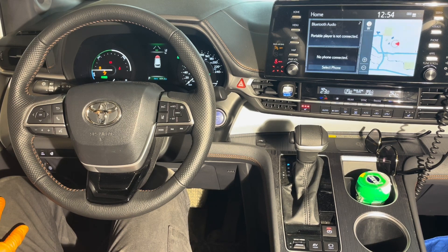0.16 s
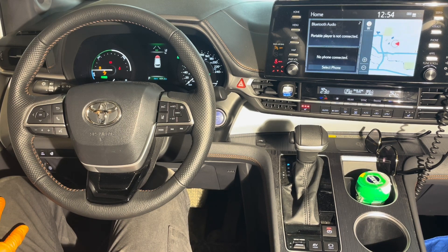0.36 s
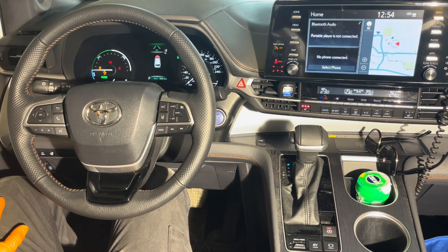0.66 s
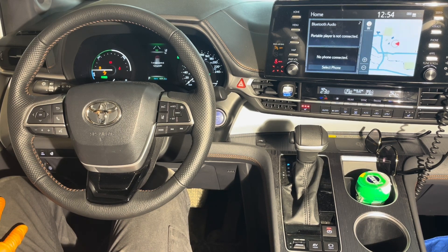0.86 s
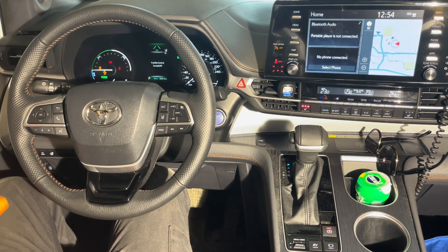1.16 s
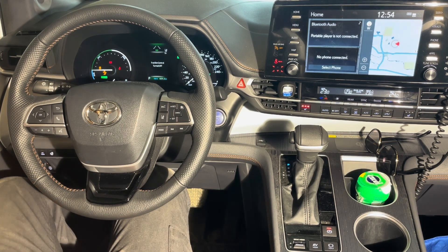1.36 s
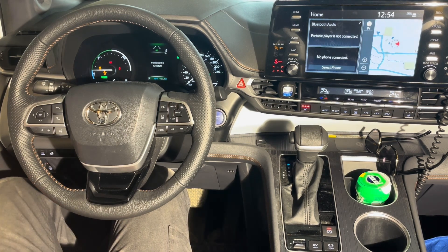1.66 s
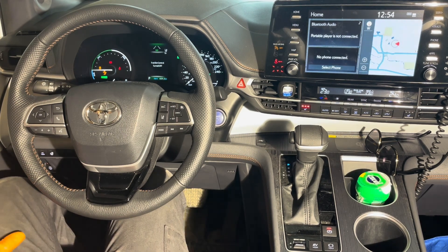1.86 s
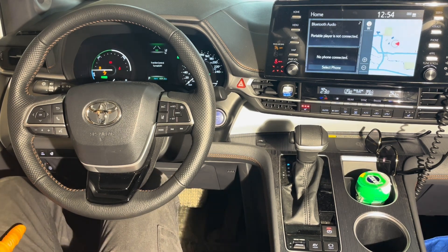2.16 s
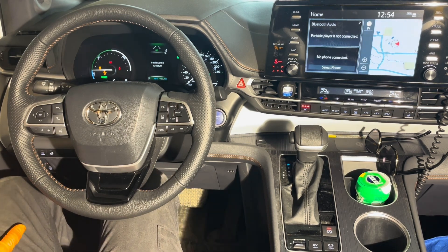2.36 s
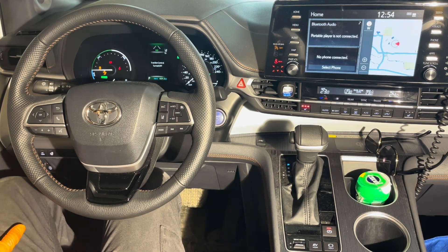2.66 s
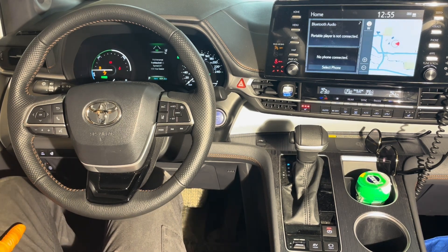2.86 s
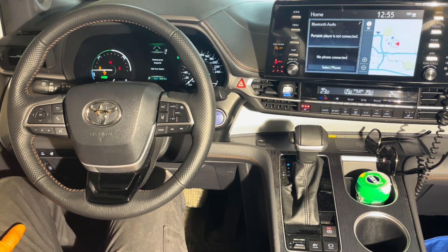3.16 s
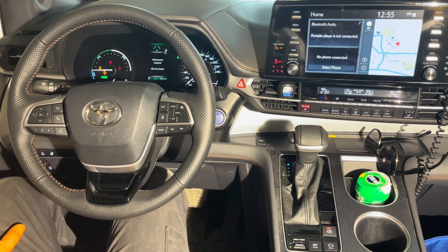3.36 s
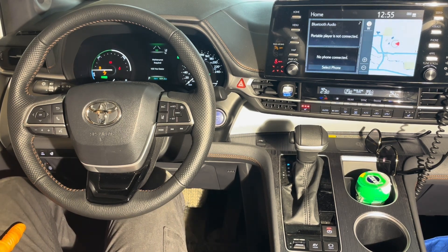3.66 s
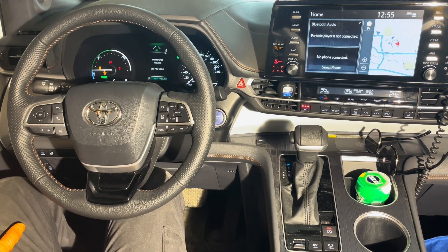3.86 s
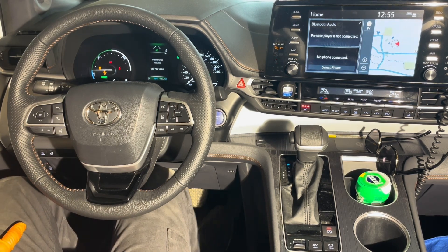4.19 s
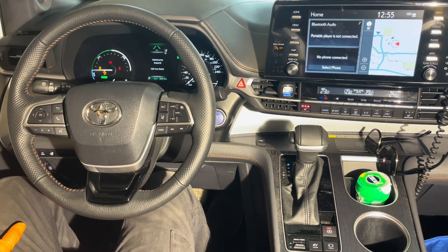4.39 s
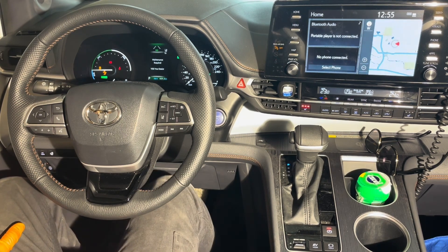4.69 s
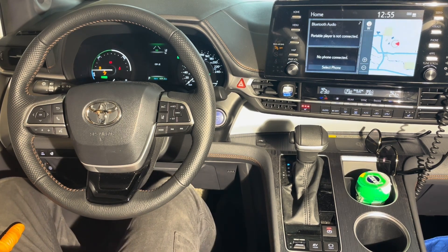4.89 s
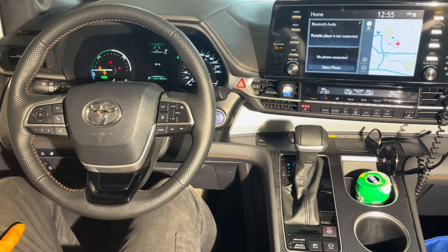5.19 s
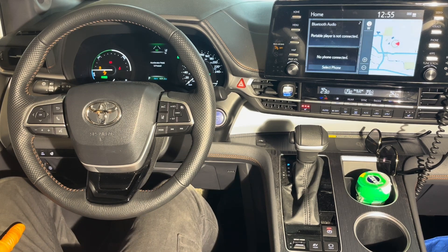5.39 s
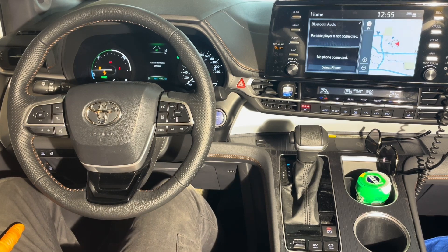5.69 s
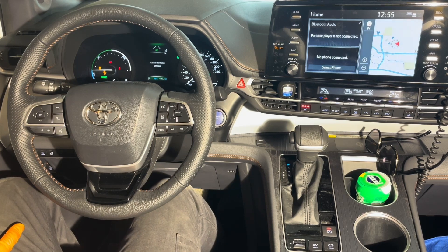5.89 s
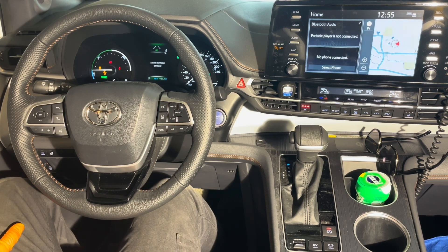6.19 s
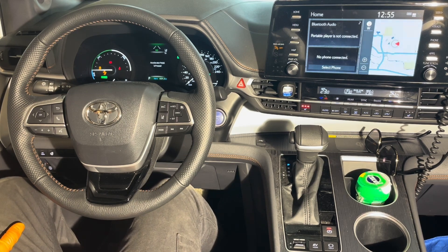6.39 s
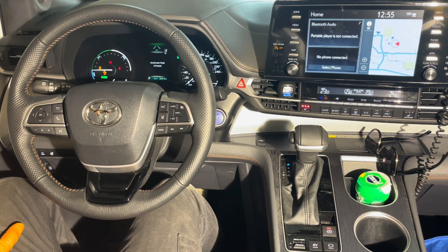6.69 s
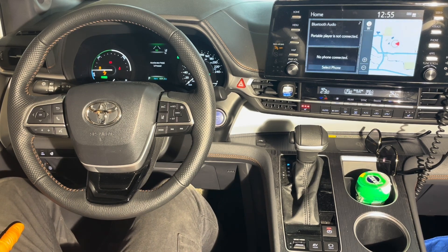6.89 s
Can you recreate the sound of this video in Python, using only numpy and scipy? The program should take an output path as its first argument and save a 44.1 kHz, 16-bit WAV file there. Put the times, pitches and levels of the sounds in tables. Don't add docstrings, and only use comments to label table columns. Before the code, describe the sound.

Car cabin interior: steady brisk engine idle, wavering fan drone and soft booming, then the throttle opens and the engine climbs in pitch.

```python
import sys
import numpy as np
from scipy import signal
from scipy.fft import rfft, irfft, next_fast_len
from scipy.io import wavfile
from scipy.ndimage import map_coordinates

SR = 44100
rng = np.random.default_rng(int(sys.argv[2]) if len(sys.argv) > 2 else 0)


def nominal_scale(level):
    x = np.asarray(level, float) / 20
    return 10 ** x


def inscribe(sig):
    pcm = np.round(np.clip(np.atleast_2d(sig).T, -1, 1) * 32767)
    wavfile.write(sys.argv[1], SR, pcm.astype(np.int16))


N = 310464
TIME = np.arange(N) / SR

# (centre [Hz], width [Hz], level over the flat path [dB])
PANELS = [(323, 24, 7), (352, 27, 9), (418, 20, 0.5), (530, 22, 12.5), (589, 37, 12.5), (683, 50, -21),
          (815, 56, 7.5), (906, 25, 3), (968, 26, 2.5), (1008, 31, 4.5), (1134, 25, 9.5), (1270, 37, 2),
          (1400, 14, 5.5), (1500, 18, 7.5), (1595, 48, 7), (1761, 39, 8.5), (1873, 30, 6), (1978, 23, 4),
          (2160, 31, 3.5), (2306, 20, 10), (2425, 26, 4.5), (2624, 44, 7), (2820, 45, 7), (3565, 39, 7.5),
          (10380, 150, -17)]


def curves(rows):
    knots_s, *columns = np.transpose(rows)
    return [np.interp(TIME, knots_s, column) for column in columns]


def wobble(rate_hz):
    knots = rng.standard_normal(int(N * rate_hz / SR) + 4)
    return np.interp(TIME * rate_hz, np.arange(len(knots)), knots)


def filtered(x, response):
    size = next_fast_len(N + 8192)
    return irfft(rfft(x, size) * response(np.fft.rfftfreq(size, 1 / SR)), size)[..., :N]


def rush(spectrum, shape=lambda hz: 1, source=None):
    knots_hz, db = np.transpose(spectrum)
    if source is None:
        source = rng.standard_normal((2, N))

    def colour(hz):
        return nominal_scale(np.interp(np.log(hz + 1), np.log(knots_hz), db)) * shape(hz)
    pair = filtered(source, colour)
    return pair / pair.std()


def tone(turns, db):
    return np.sqrt(2) * nominal_scale(db) * np.sin(2 * np.pi * (turns + rng.random()))


def lift(hz, modes):
    power = sum(nominal_scale(db) ** 2 / (1 + (2 * (hz - centre) / width) ** 2) for centre, width, db in modes)
    return np.sqrt(1 + power)


def vents():
    # (time [s], level [dB])
    flow = [
        (0, -68.5),
        (5.39, -67.5),
        (5.43, -74),
        (6.21, -67.5),
        (6.41, -65),
        (7.04, -65.5),
    ]
    # (frequency [Hz], density [dB per Hz])
    hiss = [(1500, -9), (3000, 8), (5000, -2.5), (7000, -5.5), (9000, -1.5), (10400, -10), (11800, -5.5),
            (13500, -29), (14500, -7), (15500, -9)]
    return nominal_scale(curves(flow)[0] + 11.5 + .6 * wobble(7.7)) * rush(hiss)


def trim_knock():
    # (time [s], level [dB], frequency [Hz])
    taps = [
        (4.04, -42, 312),
        (4.05, -44, 355),
        (4.075, -44, 290),
    ]
    knock = np.zeros(N)
    for start_s, db, hz in taps:
        since_s = np.clip(TIME - start_s, 0, None)
        knock += nominal_scale(db - 60 * since_s / 0.25) * np.sin(2 * np.pi * hz * since_s)
    return knock


def cabin_boom():
    # (middle time [s], length [s], level [dB])
    swells = [(0.203, 0.32, -42.5), (0.667, 0.58, -42.5), (1.32, 0.53, -42), (1.95, 0.36, -41),
              (2.396, 0.56, -40), (3.05, .4, -49), (3.4, 0.42, -41.5), (3.9, 0.61, -43.5),
              (4.52, 0.25, -41), (4.95, .5, -40), (5.331, 0.31, -39.5), (6.747, 0.59, -42.5)]
    envelope = np.zeros(N)
    for middle_s, length_s, db in swells:
        place = np.clip((TIME - middle_s) / (1.2 * length_s), -.5, .5)
        envelope += nominal_scale(db) * np.cos(np.pi * place)
    return envelope * tone(129.4 * TIME, 0)


def fan():
    # (time [s], shaft rate [Hz])
    speed = [(0, 24), (.5, 21.1), (1.02, 18.7), (1.4, 21.6), (2, 24.6), (2.4, 25.8), (2.8, 25.6),
             (3.2, 26.55), (4, 25.5), (4.9, 25.8), (7.04, 26.4)]
    # (multiple of the shaft, level [dB])
    blades = [(7, -44), (9, -53), (12, -60), (14, -60.5), (16, -65)]
    # (frequency [Hz], gain [dB])
    duct = [(150, -21), (163, -17), (174, -3), (184, 0.5), (196, -2), (210, 5), (230, 2.5), (240, -8.5)]
    shaft_hz, = curves(speed)
    turns = np.cumsum(shaft_hz) / SR
    sound = tone(turns, -68)
    for multiple, db in blades:
        duct_db = np.interp(multiple * shaft_hz, *np.transpose(duct))
        sound += tone(multiple * turns, db + duct_db + 1.8 * wobble(6))
    return sound


def throttle_air():
    # (time [s], level [dB])
    whistle = [
        (0, -95),
        (6.1, -94),
        (6.3, -72),
        (6.6, -67),
        (6.7, -76),
        (7.04, -68),
    ]
    # (frequency [Hz], density [dB per Hz])
    wheeze = [(9500, -30), (10800, 8), (11700, 6), (12500, -13), (13500, -30)]
    return nominal_scale(curves(whistle)[0]) * rush(wheeze)


def generator_whine(cycle):
    # (time [s], level [dB])
    level = [
        (0, -95),
        (5.75, -82),
        (5.95, -72),
        (6.12, -63),
        (6.25, -66),
        (6.4, -63),
        (6.48, -85),
        (7.04, -90),
    ]
    return tone(87 * 4 * cycle + .12 * wobble(60), curves(level)[0] + 2.5 * wobble(25))


def timing_chain(firing_hz, uneven_cycle):
    past_db = -20 * np.clip((firing_hz - 44.5) / 4, 0, 1)
    climb_db = 6 * np.minimum(firing_hz - 43.4, .5)
    return tone(76 * uneven_cycle, -50.5 + climb_db + wobble(5) + past_db + wobble(25))


def bulkhead(hz):
    knots_hz = np.arange(0, SR / 2, 25)
    ripple_db = np.interp(hz, knots_hz, 4 * np.sin(knots_hz ** 2))
    return lift(hz, PANELS) * nominal_scale((hz > 2900) * ripple_db)


def clatter(cycle):
    steps = 2048
    patterns = rng.standard_normal((2, 12, steps))
    place = [TIME * 1.5, cycle % 1 * (steps - 1)]
    return np.array([map_coordinates(pattern, place, order=1) for pattern in patterns])


def mechanical_roar(cycle, revved, effort_db):
    # (frequency [Hz], density [dB per Hz])
    roar = [(200, -23), (400, -8.5), (700, -3.5), (1100, -7.5), (1600, -5), (2400, -7), (3200, -15),
            (5000, -18.5), (7000, -27), (9500, -42), (15500, -46)]
    firing_swell = .05 * np.sin(2 * np.pi * 4 * cycle)
    crank_swell = .06 * np.sin(2 * np.pi * 2 * cycle)
    works = (1 + firing_swell + crank_swell) * rng.standard_normal((2, N))
    works += nominal_scale(-1.5 + 4.5 * revved) * clatter(cycle)
    return nominal_scale(effort_db + 4.5 + .35 * wobble(9)) * rush(roar, bulkhead, works)


def rumble(effort_db, tip_in_db):
    # (frequency [Hz], density [dB per Hz])
    spectrum = [(15, -33), (33, -22), (40, -6), (70, -0.5), (110, -3), (150, -3.5), (200, 0), (260, -8.5),
                (450, -10), (900, -16.5), (1500, -39)]
    level_db = -47 + 0.58 * (effort_db + 54.5) + 0.34 * tip_in_db + 0.2 * wobble(2.6)
    return nominal_scale(level_db) * rush(spectrum)


def crank_orders(firing_hz, uneven_cycle, revved, tip_in_db):
    # (multiple of the cycle, level at idle [dB], level revved [dB])
    orders = [(2, -68, -69), (3, -60, -52.5), (5, -64.5, -57), (6, -81, -72), (7, -53.5, -54),
              (9, -91, -66), (10, -62.5, -59), (11, -61.5, -56.5), (12, -61, -64), (13, -72, -54.5),
              (14, -67.5, -62), (16, -56.5, -59.5), (17, -63.5, -70), (18, -60, -62.5), (19, -65, -68),
              (20, -65, -66.5), (24, -70, -70.5),
              (32, -80, -66), (36, -80, -72), (44, -80, -68), (48, -79, -72), (52, -84, -63),
                  (54, -78, -71), (58, -76, -66), (72, -84, -60), (76, -90, -63), (80, -80, -63),
                  (88, -73, -80)]
    # (centre [Hz], width [Hz], level over the flat path [dB])
    air_modes = [(133, 13, 5), (183, 17, 5), (250, 18, 4), (297, 41, 4.5)]
    grid_hz = np.arange(2000)
    path = lift(grid_hz, air_modes + PANELS)
    sound = np.zeros(N)
    for order, idle_db, rev_db in orders:
        gain = np.interp(order * firing_hz / 4, grid_hz, path)
        level_db = idle_db + revved * (rev_db - idle_db) + tip_in_db + 3 * wobble(5)
        sound += gain * tone(order * uneven_cycle, level_db)
    return sound


def firing_tones(firing_hz, cycle, revved):
    # (firing rate [Hz], firing tone level [dB], second harmonic level [dB])
    by_speed = [(43.9, -52, -54), (47.5, -46, -40), (53.5, -57, -39), (56.5, -48, -31.5), (61, -40, -36),
                (64.5, -40, -34), (71.5, -33, -42), (76, -32, -54)]
    speed_hz, first_db, second_db = np.transpose(by_speed)
    unsteady_db = 2 * (1 - .7 * revved)
    first = tone(4 * cycle, np.interp(firing_hz, speed_hz, first_db) + unsteady_db * wobble(5))
    second = tone(8 * cycle, np.interp(firing_hz, speed_hz, second_db) + unsteady_db * wobble(5))
    return first + second


def engine():
    # (time [s], firing rate [Hz], effort level [dB])
    running = [(0, 43.3, -51.5), (.6, 42.91, -52), (.85, 43.66, -52), (1.35, 43.4, -52), (1.6, 43.69, -51),
               (2, 43.09, -52), (2.6, 43.63, -50.5), (3.1, 43.87, -50.8), (3.45, 43.29, -51),
               (3.8, 43.6, -50.5), (4.4, 43.07, -51), (5.4, 43.5, -51), (5.5, 45.32, -49),
               (5.95, 58.12, -47.5), (6.25, 65.6, -46), (6.55, 70.8, -46.5), (6.75, 73.07, -46),
               (7.04, 75.98, -44)]
    firing_hz, effort_db = curves(running)
    cycle = np.cumsum(firing_hz) / SR / 4
    uneven_cycle = cycle + .001 * wobble(30)
    revved = np.clip((firing_hz - 44) / 22, 0, 1)
    tip_in_s, tip_in_lasts_s = 5.6, 0.11
    tip_in_db = 8 * np.exp(-((TIME - tip_in_s) / tip_in_lasts_s) ** 2)
    tones = firing_tones(firing_hz, cycle, revved)
    tones += timing_chain(firing_hz, uneven_cycle)
    tones += crank_orders(firing_hz, uneven_cycle, revved, tip_in_db)
    tones += generator_whine(cycle)
    noise = mechanical_roar(cycle, revved, effort_db) + rumble(effort_db, tip_in_db)
    return tones, noise + throttle_air()


def ports(pair):
    # (frequency [Hz], left lead [rad], likeness [0-1], left minus right [dB])
    spacing = [(70, 0, 0.9, -2), (148, 0.2, 0.65, -1.6), (370, 0.37, 0.4, 4.5), (466, 2, 0.66, 6.5),
               (815, 1.65, 0.67, 6.5), (1240, 2.5, 0.29, 2.5), (2300, 6, 0.64, 1), (3260, 6.5, 0.15, 3),
               (3720, 6.5, 0.37, 3), (6630, 6.5, .5, 1), (7340, 2.5, 0.34, 1.5), (11000, 0.8, 0.9, -1),
               (12600, -14, 0.4, -2), (14400, 6.5, .9, 3)]
    knots_hz, lead_rad, alike, balance_db = np.transpose(spacing)

    def mix(hz):
        turn = np.arccos(np.clip(np.interp(hz, knots_hz, alike), 0, 1)) / 2
        skew = nominal_scale(np.interp(hz, knots_hz, balance_db) / 2)
        skew = skew * np.exp(.5j * np.interp(hz, knots_hz, lead_rad))
        left = [skew * np.cos(turn), skew * np.sin(turn)]
        right = [np.cos(turn) / skew, -np.sin(turn) / skew]
        return np.array([left, right])
    return filtered(pair, mix).sum(axis=1)


def scene():
    engine_tones, engine_noise = engine()
    tones = engine_tones + fan() + cabin_boom() + trim_knock()
    common_only = np.array([[1], [0]])
    return ports(engine_noise + vents() + common_only * tones)


def top_cut(x):
    return signal.sosfilt(signal.butter(12, 15750, fs=SR, output="sos"), x)


def record(dry):
    # (frequency [Hz], gain [dB])
    mid_kept = [(7300, 0), (7620, -6), (7640, -80), (8940, -80), (8960, -4), (9400, 0), (12400, 0),
                (13100, -3), (13740, -7), (13760, -80)]
    # (frequency [Hz], gain [dB])
    side_kept = [(10300, 0), (11000, -5), (11050, -80), (12400, -80), (12450, -5), (13300, -3), (14200, 0),
                 (15750, 0)]

    def passed(hz):
        return np.array([nominal_scale(np.interp(hz, *np.transpose(kept))) for kept in (mid_kept, side_kept)])
    left, right = dry
    mid, side = filtered(np.array([left + right, left - right]) / 2, passed)
    return top_cut(np.array([mid + side, mid - side]))


dry = scene()
out = record(dry)
inscribe(out)
```